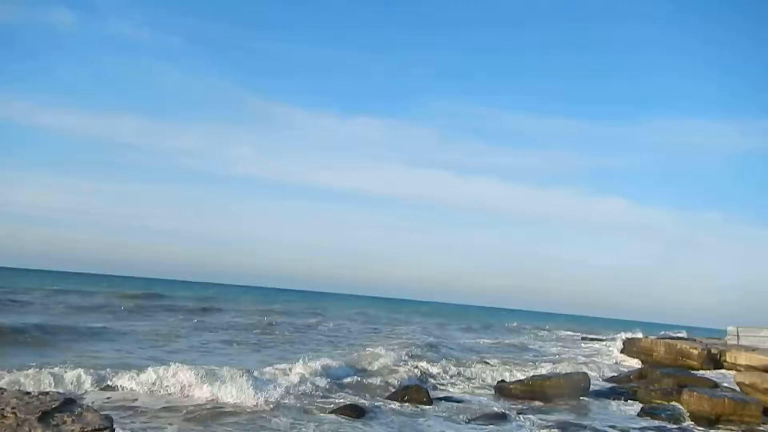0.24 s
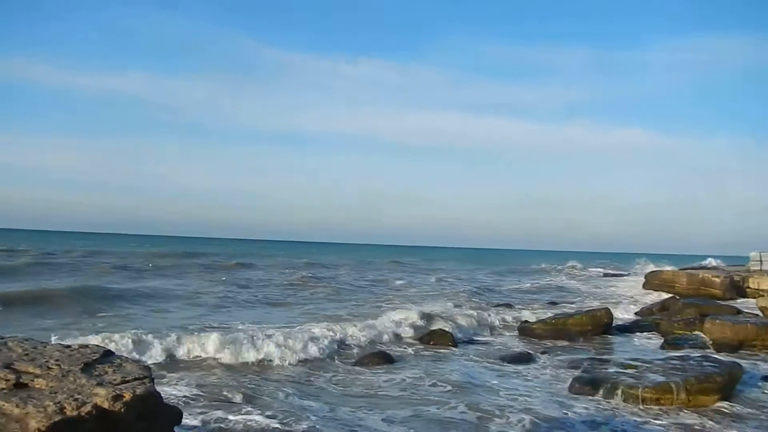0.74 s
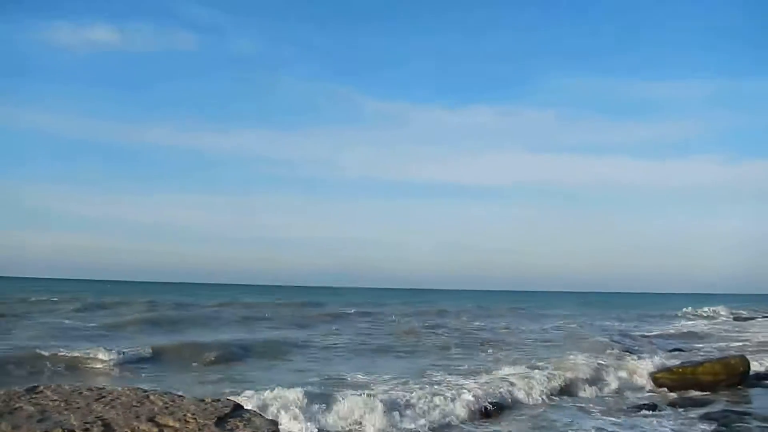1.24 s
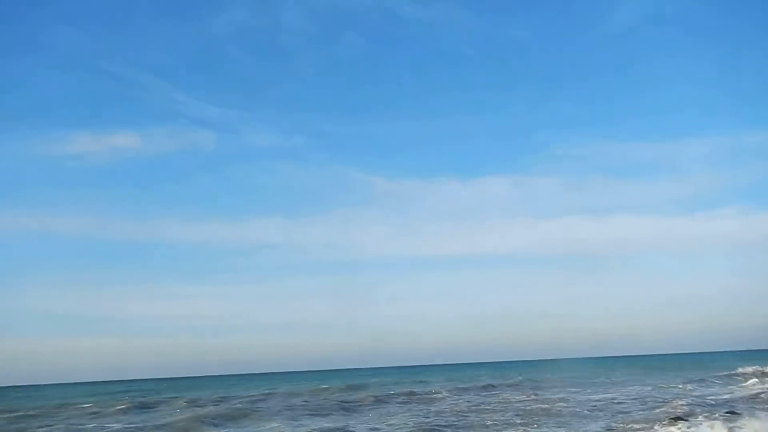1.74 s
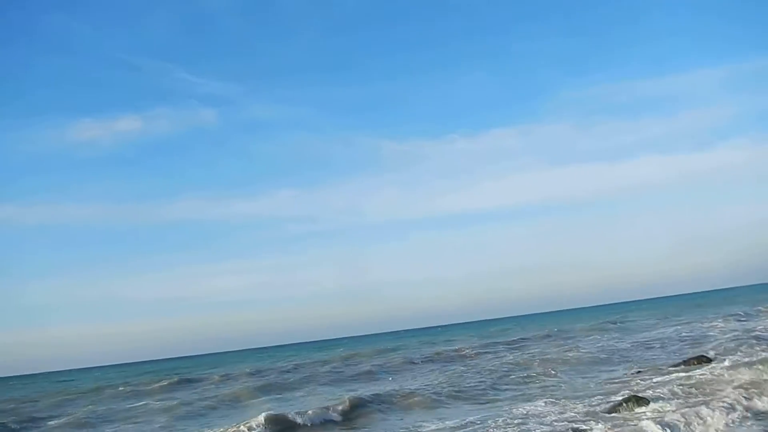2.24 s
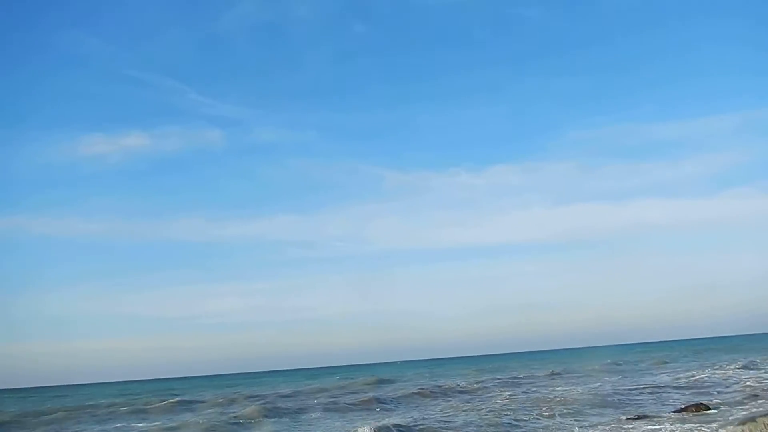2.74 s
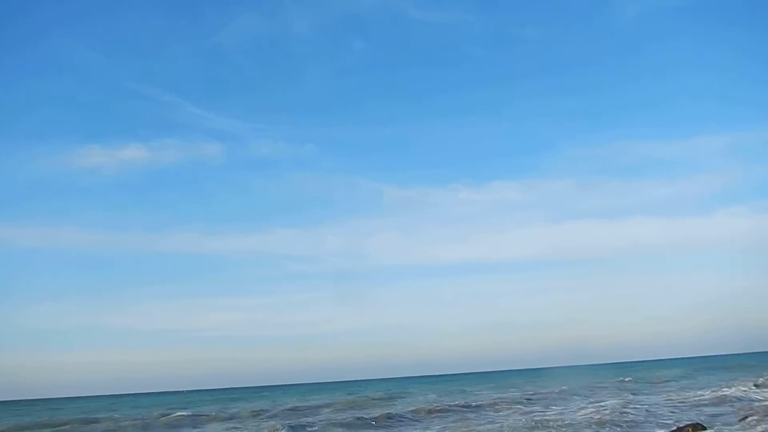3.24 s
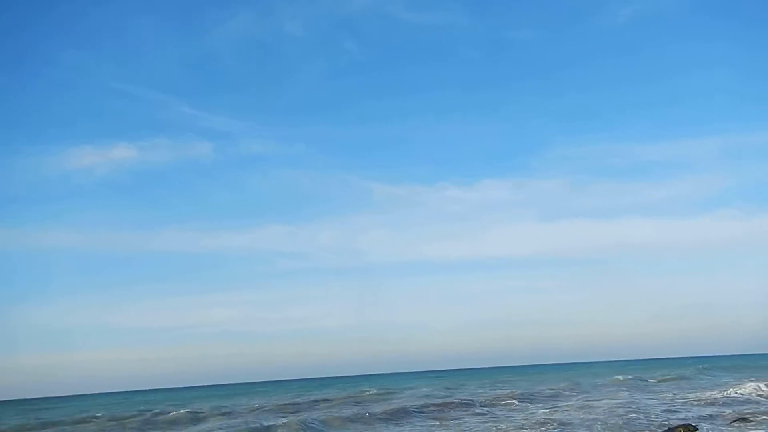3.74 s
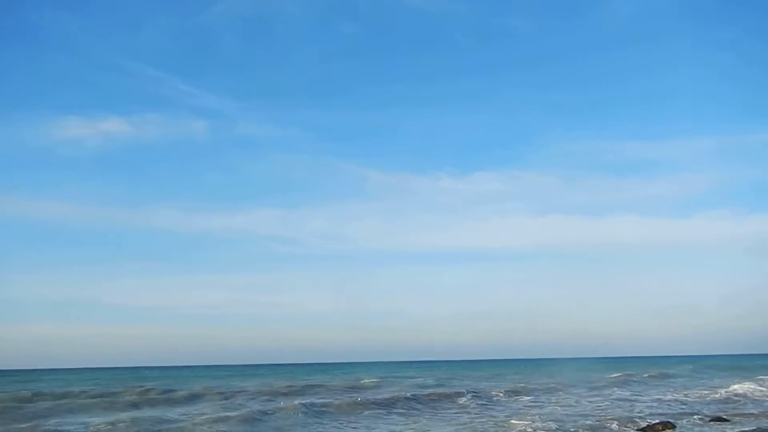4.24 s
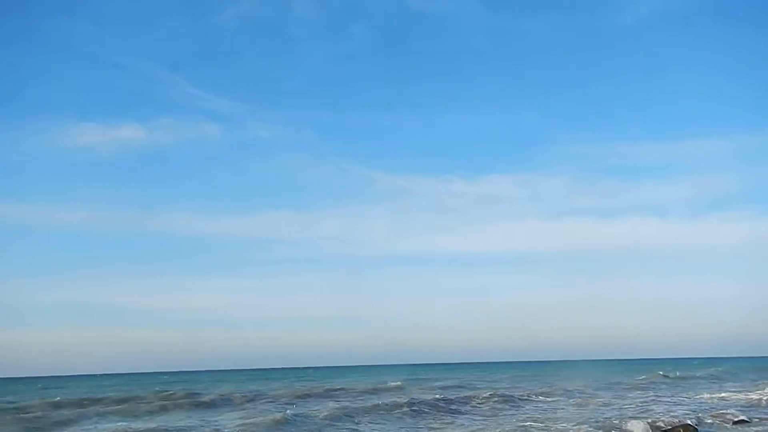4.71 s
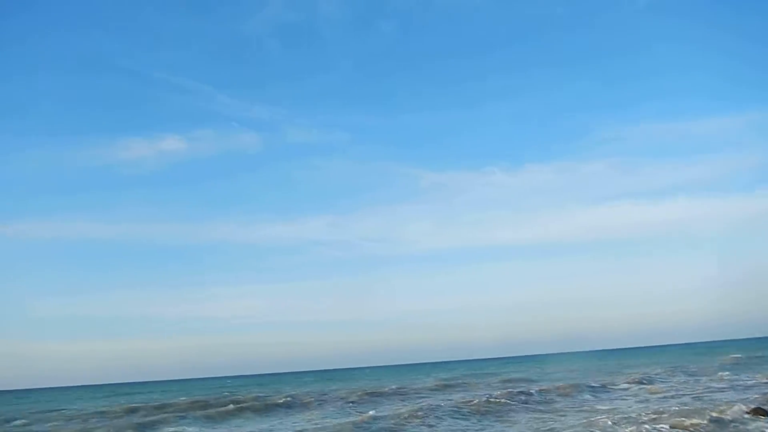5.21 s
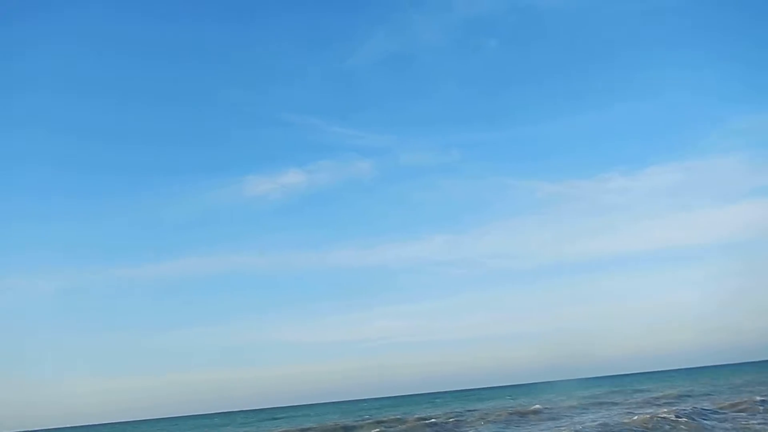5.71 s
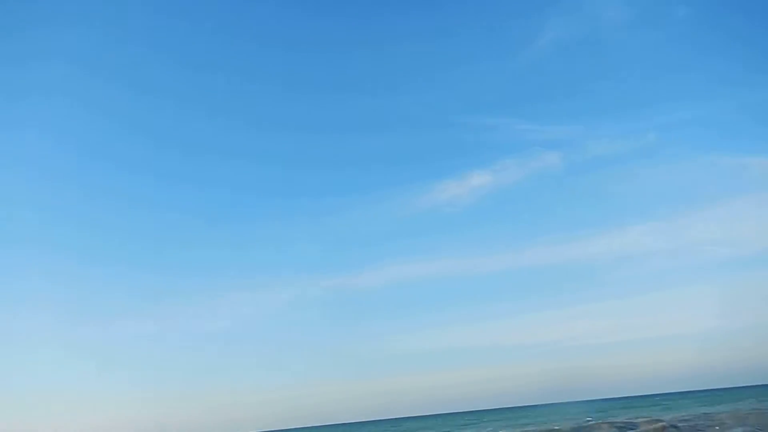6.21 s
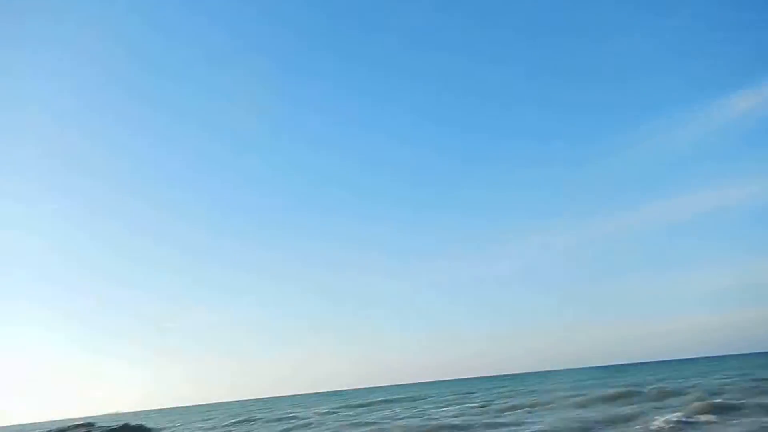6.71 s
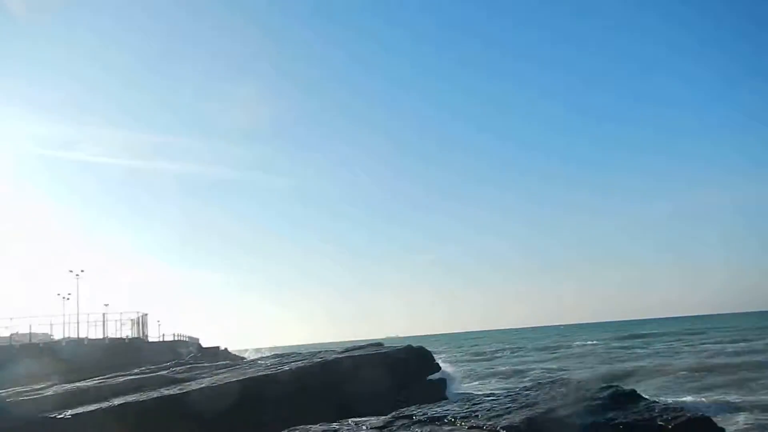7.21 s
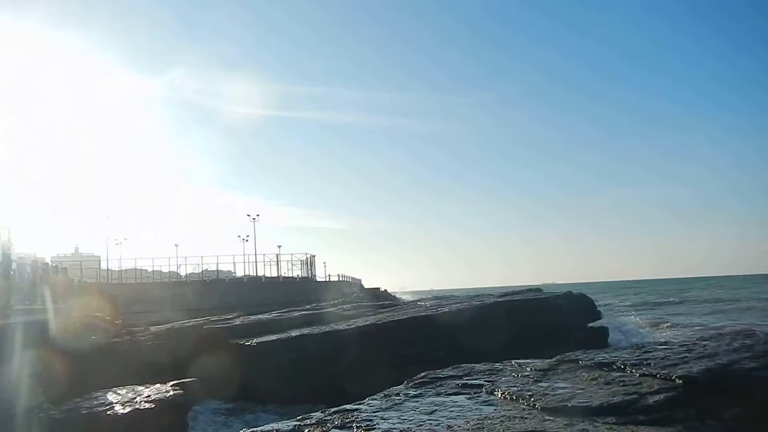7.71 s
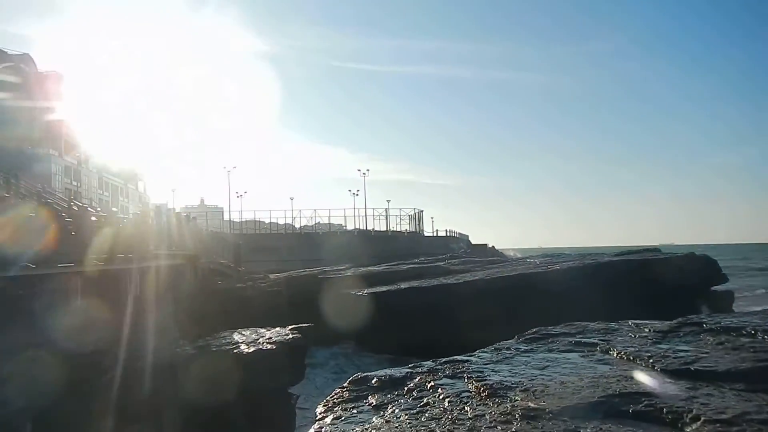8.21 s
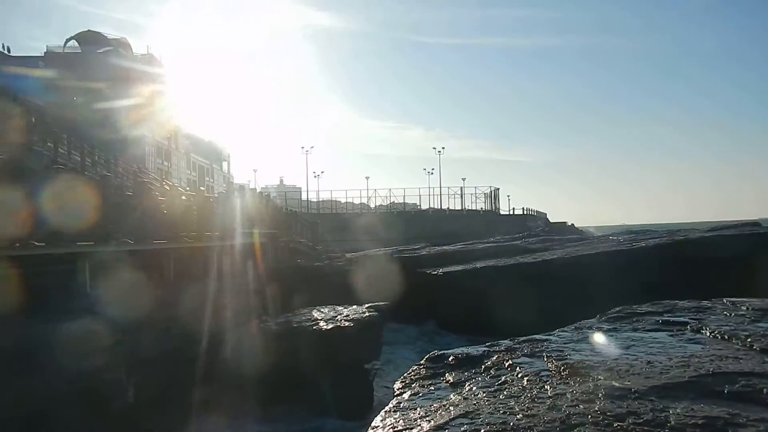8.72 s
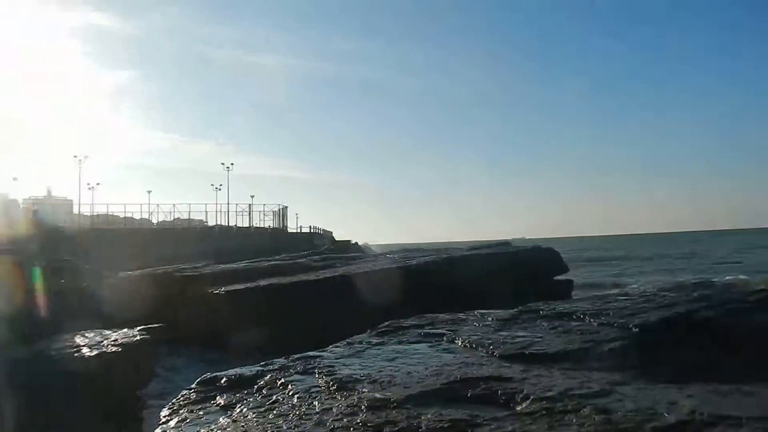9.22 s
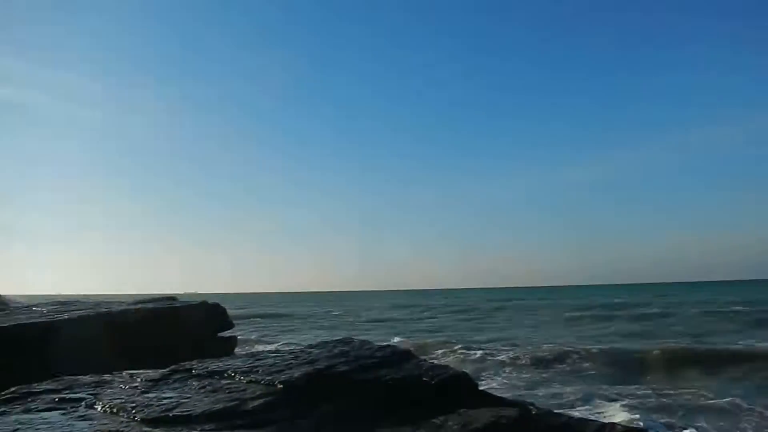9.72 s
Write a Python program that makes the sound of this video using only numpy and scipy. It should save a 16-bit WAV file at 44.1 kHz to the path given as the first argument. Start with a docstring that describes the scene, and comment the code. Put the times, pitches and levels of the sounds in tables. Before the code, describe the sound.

Sea surf washes over boulders for the whole ten seconds, a gently swelling foamy hiss above a low roar and faint deep rumble. Wind buffets the hand-held microphone from the start. Fingers tick and briefly rub on its casing at about 0.3 seconds and between 0.8 and 1.4 seconds; after the last sharp click, everything drops in level and creeps back over a second. From 2 to 5 seconds the gusts are strongest, with uneven low thumps and flutters, mostly on the right, and brief dips in loudness after hard hits. Buffeting continues on both sides, with faint water slaps around 5.5 seconds and a last strong flurry near 7. The wind then falls away, apart from one small puff near 8.8. From about 7.5 seconds, water surging between the rocks adds a hollow low boom beneath the surf, fullest around 9.5.

```python
"""Surf breaks and foams over boulders: countless bursting bubbles sum to broadband noise over a low roar.
Turbulent gusts buffet the two microphone ports of a hand-held camera with pressure pulses and flutters.
Early on, fingers tick and rub on the casing. Beneath lies a deep rumble, and near the end surging
water excites the air resonances of a gap between the rocks. After loud moments the whole level
drops at once and creeps back."""
import sys
import numpy as np
from scipy import signal
from scipy.fft import rfft, irfft
from scipy.io import wavfile
from scipy.ndimage import uniform_filter1d

SR = 44100
rng = np.random.default_rng(int(sys.argv[2]) if len(sys.argv) > 2 else 0)


def bounce(signal):
    """Save signal as a 16-bit WAV file at the path given by the first command-line argument."""
    frames = np.transpose(np.atleast_2d(signal))
    limited = np.clip(frames, -1, 1)
    pcm = np.round(limited * 32767).astype(np.int16)
    wavfile.write(sys.argv[1], SR, pcm)


N = 438794
TIME = np.arange(N) / SR
PAN_SPLIT = np.array([[.5], [-.5]])  # shares a left-minus-right level between the channels
WATER_PAN_DB = -2


def amplitude(db):
    """Amplitude ratio of a level in decibels."""
    return 10 ** (np.asarray(db) / 20)

def unit_rms(x):
    """Normalisation to unit mean power."""
    return x / np.sqrt(np.mean(x ** 2) + 1e-20)

def spectrum_at(points, hz):
    """Interpolation of (f, value) points on a logarithmic frequency axis."""
    f, value = np.transpose(points)
    return np.interp(np.log(hz + 1), np.log(f + 1), value)

def curves_at(rows, t):
    """Linear interpolation of (t, values...) rows, one curve per value."""
    times, *values = np.transpose(rows)
    return np.array([np.interp(t, times, v) for v in values])

def octave_bell(hz, centre_hz, octaves):
    """Gaussian band on a logarithmic frequency axis."""
    return np.exp(-(np.log2((hz + 1) / centre_hz) / octaves) ** 2)

def resonance(hz, centre_hz, width_hz):
    """Lorentzian curve of unit height."""
    return 1 / (1 + (2 * (hz - centre_hz) / width_hz) ** 2)

def minimum_phase(gain, size=4096):
    """Causal impulse response: its phase is minus the Hilbert transform of the log gain."""
    log_gain = np.log(np.maximum(np.r_[gain, gain[-2:0:-1]], 1e-5))
    return np.fft.ifft(np.exp(log_gain - 1j * signal.hilbert(log_gain).imag)).real[:size]

def wander(rate_hz, shape):
    """Smooth random fluctuation: noise through a two-pole low-pass."""
    pole = np.exp(-2 * np.pi * rate_hz / SR)
    return unit_rms(signal.lfilter([1], np.convolve([1, -pole], [1, -pole]), rng.standard_normal(shape)))

def trapezoid(t, start, length, edge_s):
    """Envelope with linear rise and fall; returns its slice of t and its values."""
    span = slice(*np.searchsorted(t, [start - edge_s, start + length + edge_s]))
    return span, np.clip(np.minimum(t[span] - start, start + length - t[span]) / edge_s + .5, 0, 1)


# Envelope of the deepest rumble: t/s, level/dB
RUMBLE_LEVEL = [(0, -40), (.6, -44), (1.2, -44), (4.0, -46), (5.5, -38), (6.3, -37), (7.0, -44), (7.4, -35),
                (7.9, -32), (8.05, -40), (8.3, -46), (8.7, -35), (9.1, -34), (9.45, -49.5), (9.95, -47)]

def deep_rumble():
    """Narrow-band noise heaves at the lower limit of hearing, partly coherent between the ports."""
    band = octave_bell(np.fft.rfftfreq(N, 1 / SR), centre_hz=30, octaves=0.72)
    heave = irfft(rfft(rng.standard_normal((2, N))) * band, N)
    return unit_rms(heave + 0.24 * heave[::-1]) * amplitude(curves_at(RUMBLE_LEVEL, TIME)[0])


# Envelope of the boom between the rocks: t/s, level/dB
CAVITY_LEVEL = [(0, -47), (7.0, -54), (7.6, -34), (8.6, -32), (9.2, -32), (9.5, -25), (9.95, -28)]
# Air modes of the gap: f/Hz, bandwidth/Hz, relative level/dB
CAVITY_MODES = [(121, 38, -1), (238, 63, 0.5), (390, 130, -8.5)]

def cavity_boom():
    """Cavity resonance: surging water drives the air in a gap between boulders."""
    hz = np.fft.rfftfreq(N, 1 / SR)
    response = sum(amplitude(db) * resonance(hz, f, width) for f, width, db in CAVITY_MODES)
    boom = unit_rms(irfft(rfft(rng.standard_normal(N)) * response, N))
    return boom * amplitude(curves_at(CAVITY_LEVEL, TIME)[0] + PAN_SPLIT * WATER_PAN_DB)


# Finger strokes: t/s, duration/s, level/dB, centre f/Hz
STROKES = [(0.785, 0.055, -25, 8600), (0.878, .045, -39, 8200), (1.218, 0.055, -30, 7800),
           (1.245, .03, -28, 7600)]

def finger_rubs():
    """Friction noise: a finger sliding on the casing makes a grainy hiss that swells and fades."""
    out, hz = np.zeros((2, N)), np.fft.rfftfreq(8192, 1 / SR)
    for start, length, db, centre_hz in STROKES:
        n = round(length * SR)
        grit = rng.standard_normal((2, 8192)) * amplitude(3 * wander(300, (1, 8192)))
        band = np.exp(-((hz / centre_hz - 1) / 0.31) ** 2)
        hiss = unit_rms(irfft(rfft(grit) * band))[:, :n]
        out[:, round(start * SR):][:, :n] += amplitude(db) * hiss * np.sqrt(np.hanning(n))
    return out


# Finger impacts: t/s, ring gain/dB, ring T60/s, snap gain/dB, snap T60/s, snap emphasis f/Hz,
# left minus right/dB
IMPACTS = [(0.3474, -14, 0.014, -31, .01, 6000, -8), (0.804, -24, 0.0091, -4.5, 0.011, 9900, 0),
           (0.806, -11.5, 0.022, -18, .03, 8500, -6), (.8185, -30, .015, -20, .02, 9000, 0),
           (0.8977, -12, 0.0086, -16, 0.017, 8500, -3), (0.9016, -14, 0.026, -13, .012, 12000, -6),
           (.904, -11, 0.017, -26, .02, 5600, -6), (0.9112, -19.5, 0.023, -15.5, .025, 7940, -5),
           (1.03, -25, 0.016, -34, .02, 6000, 0), (1.258, -30, .02, -22, 0.03, 6500, 2),
           (1.416, -26, .025, -5, 0.025, 13700, 5)]
# Modes of the casing: f/Hz, relative level/dB
CASING_MODES = [(1250, -6), (1750, -3), (1990, -1), (2260, 0.5)]
# Spectrum of the contact noise: f/Hz, relative level/dB
SNAP_SPECTRUM = [(500, -22), (2000, -15), (5500, -4.5), (8500, -8), (16000, -17)]

def finger_ticks():
    """Impact excitation: each tick is a snap of noise plus the damped modes of the casing."""
    out, t = np.zeros((2, N + SR)), np.arange(3000) / SR
    mode_hz, mode_db = np.transpose(CASING_MODES)[:, :, None]
    hz = np.fft.rfftfreq(512, 1 / SR)
    attack = np.minimum(t / 0.00036, 1)
    phases = rng.random((len(IMPACTS), len(CASING_MODES), 1))
    noises = rng.standard_normal((len(IMPACTS), 2, len(t)))
    for impact, phase, noise in zip(IMPACTS, phases, noises):
        start, ring_db, ring_t60, snap_db, snap_t60, snap_hz, pan_db = impact
        modes = np.sum(amplitude(mode_db) * np.sin(2 * np.pi * (mode_hz * t + phase)), axis=0)
        ring = modes * attack * amplitude(ring_db - 60 * t / ring_t60)
        emphasis_db = 15.6 * np.exp(-((hz / snap_hz - 1) / 0.2) ** 2)
        colour = minimum_phase(amplitude(spectrum_at(SNAP_SPECTRUM, hz) + emphasis_db), size=256)
        burst = noise * amplitude(snap_db - 60 * t / snap_t60)
        snap = signal.oaconvolve(burst, colour[None])[:, :len(t)]
        out[:, round(start * SR):][:, :len(t)] += amplitude(PAN_SPLIT * pan_db) * (ring + snap)
    return out[:, :N]


# Brief oscillations of the air: t/s, duration/s, level/dB, f/Hz, port (0 left, 1 right)
PORT_FLUTTERS = [(1.751, 0.033, -8, 123, 1), (1.814, .03, -12, 129, 1), (2.527, 0.024, -5, 124, 1),
                 (3.114, 0.024, -6.5, 149, 1), (3.398, 0.011, -2.5, 257, 0), (3.412, .045, -3.5, 130, 1),
                 (3.418, .016, -7, 340, 0), (3.514, 0.029, -0.5, 124, 1), (3.569, 0.022, -6.5, 211, 1),
                 (3.812, .045, -6, 129, 1), (3.841, .03, -9.5, 193, 1), (4.264, 0.053, -9, 102, 1),
                 (4.46, .023, -10.5, 150, 1), (4.628, 0.019, -11, 149, 1), (4.663, .02, -10, 164, 1),
                 (4.813, 0.042, -7, 117.5, 0), (4.942, 0.025, -10.5, 166, 0), (5.015, 0.028, -10, 148, 0),
                 (5.375, 0.023, -10, 268, 0), (5.4, .022, -15, 558, 0), (6.377, 0.026, -10, 233, 0),
                 (6.577, 0.048, -7, 232, 0), (6.655, 0.013, -7, 251, 0), (6.831, 0.021, -12.5, 181, 0),
                 (6.863, 0.028, -7, 249, 1), (6.87, 0.032, -2.5, 205, 0), (6.927, 0.021, -2.5, 221, 1),
                 (7.011, 0.017, -11, 270, 1)]

def port_flutters():
    """Flow-induced oscillation: air locks into a wobbling tone at a port. Returns sound and envelope."""
    out, locked = np.zeros((2, N)), np.zeros((2, N))
    pitch_drift, level_drift = wander(81, (2, 2, N))
    for (start, length, db, hz, port), phase in zip(PORT_FLUTTERS, rng.random(len(PORT_FLUTTERS))):
        span, envelope = trapezoid(TIME, start, length, edge_s=0.0079)
        pitch_hz = hz * (1 + .12 * pitch_drift[port, span])
        angle = 2 * np.pi * (np.cumsum(pitch_hz) / SR + phase)
        wave = np.cos(angle) + 0.21 * np.cos(2 * angle)  # the second harmonic sharpens the crests
        out[port, span] += envelope * amplitude(db + 2.8 * level_drift[port, span]) * wave
        locked[port, span] = np.maximum(locked[port, span], envelope)
    return out, locked


# Steady stream as the camera turns in it: t/s, level/dB, rumble f/Hz, factor on the spectral slopes
AIR_STREAM = [(0, -33, 110, 0.96), (.5, -30, 162, 1.55), (1.1, -23.5, 145, 1.3), (1.7, -21, 120, 1.15),
              (2.3, -16, 157, 0.93), (2.5, -19.5, 130, 1.1), (3.5, -19.5, 132, 1.06), (3.9, -31, 138, 1.37),
              (4.8, -21.5, 137, 1.07), (5.38, -18.5, 158, 1), (5.6, -20.5, 124, 1.1), (5.95, -22, 105, 1.1),
              (6.15, -28, 118, 2.1), (6.35, -20, 169, 3.6), (6.5, -23, 233, 2.2), (6.9, -23.5, 235, 1.8),
              (7.03, -27, 238, 1.3), (7.25, -36, 144, 0.78), (7.6, -34, 148, 0.52), (8.5, -47, 152, 2.8),
              (9.95, -48, 220, 1.4)]
# Gusts on single ports: t/s, duration/s, level/dB, rumble f/Hz, port (0 left, 1 right)
GUSTS = [(0.067, 0.098, -19.5, 121, 0), (0.082, 0.053, -14, 135, 1), (0.184, 0.032, -17.5, 120, 1),
         (0.186, 0.025, -14.5, 145, 0), (0.443, 0.082, -16, 184, 0), (0.522, 0.049, -17, 112, 0),
         (0.735, 0.034, -12.5, 168, 0), (0.779, 0.034, -13, 175, 0), (0.86, 0.068, -16, 128, 1),
         (1.017, 0.027, -7.5, 129, 1), (1.126, 0.049, -12.5, 176, 1), (1.199, 0.078, -10, 176, 0),
         (1.204, 0.075, -12.5, 162, 1), (1.287, 0.045, -8, 122, 1), (1.309, 0.021, -9.5, 202, 0),
         (1.349, 0.026, -13, 157, 0), (1.394, 0.023, -11.5, 168, 1), (1.452, 0.37, -19, 130, 1),
         (1.52, 0.056, -15, 131, 1), (1.61, 0.047, -17, 147, 1), (1.653, 0.057, -18.0, 114, 1),
         (1.75, 0.045, -10, 140, 1), (1.802, 0.056, -20, 142, 1), (1.847, 0.035, -17.5, 112, 0),
         (1.87, 2.5, -18.5, 151, 1), (1.883, 0.11, -9.5, 166, 1), (1.888, 0.054, -16, 108, 0),
         (1.987, 0.065, -9, 178, 1), (2.073, 0.048, -12.5, 156, 1), (2.095, 0.15, -11.0, 155, 0),
         (2.146, 0.14, -6, 184, 1), (2.258, 0.034, -14, 162, 0), (2.266, 0.064, -7, 206, 1),
         (2.324, 0.16, -11.5, 191, 1), (2.495, 0.06, -8.5, 136, 1), (2.501, 0.042, -13, 103, 0),
         (2.56, 0.035, -9.0, 169, 1), (2.603, 0.036, -10, 161, 1), (2.683, 0.081, -13, 151, 1),
         (2.692, 0.05, -11, 116, 0), (2.765, 0.055, -21, 113, 0), (2.768, 0.061, -8, 133, 1),
         (2.83, 0.042, -8.5, 155, 1), (2.897, 0.073, -10.5, 123, 1), (3.077, 0.04, -9, 121, 1),
         (3.206, 0.092, -19, 150, 0), (3.257, 0.048, -20, 174, 0), (3.341, 0.033, -8, 151, 1),
         (3.376, 0.064, -8, 248, 0), (3.395, 0.084, -9.5, 146, 1), (3.512, 0.037, -3, 158, 1),
         (3.526, 0.025, -6, 153, 0), (3.572, 0.033, -9.5, 191, 1), (3.609, 0.074, -8.5, 162, 1),
         (3.72, 0.074, -6, 145, 1), (3.814, 0.06, -12, 158, 1), (3.87, 0.071, -9.5, 131, 1),
         (4.076, 0.026, -16, 174, 1), (4.261, 0.028, -7, 123, 1), (4.287, 0.025, -12.0, 119, 1),
         (4.294, 0.055, -10.5, 174, 0), (4.323, 0.024, -13.5, 117, 1), (4.4, 1.7, -22, 140, 1),
         (4.423, 0.061, -14, 134, 1), (4.489, 0.031, -16.0, 138, 1), (4.59, 0.033, -14, 129, 1),
         (4.62, 0.035, -8, 164, 1), (4.659, 0.038, -11, 161, 1), (4.782, 0.094, -9.5, 138, 0),
         (4.853, 0.054, -10, 143, 1), (4.882, 0.03, -9, 185, 0), (4.91, 0.072, -9, 221, 0),
         (4.937, 0.067, -12, 143, 1), (5.013, 0.054, -22, 160, 0), (5.014, 0.023, -15, 117, 1),
         (5.047, 0.032, -10.5, 158, 1), (5.089, 0.05, -7.5, 168, 1), (5.201, 0.065, -9, 148, 0),
         (5.367, 0.064, -14.5, 228, 0), (5.44, 0.052, -23, 164, 1), (5.485, 0.032, -16, 132, 1),
         (5.546, 0.11, -16, 166, 1), (5.548, 0.05, -17.5, 134, 0), (5.627, 0.054, -15, 127, 1),
         (5.65, 0.052, -16, 142, 0), (5.79, 0.083, -16.5, 125, 0), (5.88, 0.068, -15.0, 105, 0),
         (5.93, 0.092, -14, 140, 1), (5.955, 0.038, -13, 123, 0), (5.992, 0.046, -14, 132, 0),
         (6.048, 0.05, -14, 100, 1), (6.062, 0.047, -16, 131, 0), (6.11, 0.067, -11, 130, 1),
         (6.121, 0.027, -12, 142, 0), (6.34, 0.088, -12, 205, 0), (6.45, 0.054, -13, 272, 0),
         (6.577, 0.055, -7, 233, 0), (6.648, 0.031, -8, 248, 0), (6.68, 0.046, -17, 206, 0),
         (6.84, 0.056, -11, 216, 0), (6.86, 0.05, -7, 235, 1), (6.893, 0.016, -11, 212, 0),
         (6.895, 0.087, -10, 273, 1), (6.938, 0.025, -7, 242, 0), (6.996, 0.036, -9, 278, 1),
         (6.999, 0.026, -18, 338, 0), (8.819, 0.022, -16, 131, 1)]

def airflow(t):
    """Incoherent addition: stream and gusts sum in power. Returns strength, pitch and slope factor."""
    level_db, stream_hz, slope = curves_at(AIR_STREAM, t)
    power = np.tile(amplitude(level_db) ** 2, (2, 1))
    weighted_log_pitch = power * np.log(stream_hz)
    for start, length, db, hz, port in GUSTS:
        span, envelope = trapezoid(t, start, length, edge_s=0.018)
        gust_power = (amplitude(db) * envelope) ** 2
        power[port, span] += gust_power
        weighted_log_pitch[port, span] += gust_power * np.log(hz)
    return np.sqrt(power), np.exp(weighted_log_pitch / power), slope


# Hardest single buffets: t/s, relative level/dB, port (0 left, 1 right)
BUFFETS = [(0.098, 5, 1), (0.198, 5, 0), (1.148, 0, 1), (1.248, -2, 0), (1.305, 8, 1), (1.324, 7, 0),
           (1.407, 9, 1), (2.161, 6, 0), (2.193, 6, 1), (2.287, 12, 1), (2.58, 7, 1), (2.74, 7, 0),
           (2.8, 7, 1), (2.803, 3.5, 0), (2.84, 2, 0), (3.096, 7, 1), (3.236, 10.5, 1), (3.408, 13, 0),
           (3.52, 10, 1), (3.549, 15, 0), (3.882, 3, 1), (4.083, 6, 1), (4.325, 12, 0), (4.594, 3, 1),
           (4.876, 7, 1), (4.914, 0, 0), (4.943, 10, 0), (4.989, 10, 1), (5.247, 0, 0), (5.39, 10, 0),
           (6.009, 3, 0), (6.14, 8.5, 0), (6.155, 13, 1), (6.473, 8, 0), (6.699, 2, 0), (6.709, 7, 0),
           (6.849, 10, 0), (6.903, 13, 0), (6.953, -2, 0), (7.016, 12, 1), (8.832, 1, 1)]
# Eddy pressure spectrum at the reference pitch: f/Hz, relative level/dB
EDDY_SPECTRUM = [(12, -34), (25, -14), (40, -4.5), (60, -0.5), (125, 0), (250, -8), (500, -17.5),
                 (1200, -38), (4000, -72)]
EDDY_REFERENCE_HZ, EDDIES_PER_S = 135, 700

def wind_buffeting():
    """Turbulent pressure as shot noise: eddies strike each port independently in uneven pulses."""
    sizes = amplitude(2 * np.minimum(rng.exponential(1, (2, N)), 4)) * rng.choice([-1., 1.], (2, N))
    arrivals = rng.random((2, N)) < EDDIES_PER_S / SR
    pulses = unit_rms(sizes * arrivals * amplitude(2 * wander(17.6, (2, N))))
    flutter, locked = port_flutters()
    pulses *= airflow(TIME)[0] * (1 - 0.59 * locked)  # flutter replaces part of the eddies
    unit_pulse_peak = 0.34  # approximate height of a unit impulse after filtering
    scatter = rng.uniform(-0.994, 1, (len(BUFFETS), 2, 4))
    for (time, db, port), (offsets, side_sizes) in zip(BUFFETS, scatter):
        at = ((time + 0.01144 * np.r_[0, offsets]) * SR).astype(int)  # a main pulse amid four smaller
        pulses[port, at] += np.r_[1, .4 * side_sizes] * amplitude(db) / unit_pulse_peak
    hz, t, spectra = signal.stft(pulses, SR, nperseg=1024, noverlap=768)
    hz = hz[:, None]
    strength, pitch_hz, slope = airflow(t)
    colour = amplitude(slope * spectrum_at(EDDY_SPECTRUM, hz * EDDY_REFERENCE_HZ / pitch_hz[:, None]))
    colour /= np.sqrt(np.mean(colour ** 2, axis=1, keepdims=True))
    # Faster air sheds smaller eddies, so strong gusts are brighter.
    bright_db = 0.57 * (20 * np.log10(strength)[:, None] + 15) * hz / (hz + 900)
    spectra *= colour * amplitude(bright_db) * np.exp(-1j * np.pi / 3)  # phase lag: push, then suction
    ports = signal.istft(spectra, SR, nperseg=1024, noverlap=768)[1][:, :N] + flutter
    return ports + 0.058 * ports[::-1]  # large eddies reach both ports


# Course of the waves: t/s, foam level/dB, roar boost/dB, tumbling-water boost/dB, fizz boost/dB
WAVES = [(0, -29, -2.5, 1.5, 1), (.35, -24.5, 0, -0.5, -3), (.9, -25.5, -4, 1.5, 1), (1.2, -22, -3, 0.5, 1),
         (1.45, -28.5, 0.5, 1.5, -1), (2.0, -24.5, -2, 1, 2), (2.6, -22.5, -2, -0.5, 0),
         (2.95, -25, -4.5, 1, 2.5), (3.4, -22, 2.5, -1, 1), (4.35, -21.5, -2.5, -0.5, 2.5),
         (4.54, -21.5, -2.5, 1, 4), (4.65, -26, -2, 2.5, 1.5), (5.15, -24.5, 2.5, 1.5, 3),
         (5.35, -27.5, -2, 3.5, 1), (5.385, -26.5, 0, 4, 3), (5.6, -26, 0, 5.5, 1),
         (5.95, -25.5, 1, 4, 2.5), (6.75, -27.5, 1, 2, -2), (7.3, -24.5, -2, -1.5, -1),
         (7.56, -28.5, 3.5, 1.5, -3), (8.2, -28.5, 2, 2, -1), (8.8, -28.5, 1.5, 2, -3),
         (9.2, -31.5, 6, 3.5, -2), (9.95, -27, 0.5, 2, -4)]
# Spectrum of the foam: f/Hz, relative level/dB
FOAM_SPECTRUM = [(20, -10), (60, 13), (125, 16.5), (250, 10), (500, 7), (1000, 2), (2000, -0.5),
                 (4000, -11), (16000, -11)]
# Likeness of the surf at the two ports: f/Hz, correlation coefficient
SURF_COHERENCE = [(60, 0.65), (200, 1), (1000, 0.93), (2000, 0.85), (3000, 0.4), (3800, 0.85), (4500, 0.26),
                  (5400, 0.72), (6400, 0.25), (7400, 0.22), (10000, 0.14)]
# Phase lead of the left port: f/Hz, phase/rad
SURF_PHASE_LEAD = [(1000, .15), (2350, -.05), (2800, .5), (3750, .8), (4050, -.8), (4400, -1.5), (4700, 1),
                   (5340, .7), (6000, -1.3), (6800, -4.5), (8500, -3.4), (12000, -3.4)]
# Slaps of water on rock: t/s, 1/e half-duration/s, boost/dB, centre f/Hz, 1/e half-width/octaves
WATER_SLAPS = [(5.395, 0.01, 8, 800, 0.82), (5.657, 0.021, 3.5, 900, 0.61), (5.913, .03, 6, 700, 0.74),
               (7.27, .004, 4, 2500, 1.1), (7.311, 0.0041, 8, 3000, 1.8), (8.643, 0.011, 6, 1500, .7),
               (8.78, .003, 7, 1500, .7), (9.157, .004, 3, 1500, .8), (9.878, .005, 6, 2400, .6)]

def surf():
    """Superposition: countless bursting bubbles sum to Gaussian noise, in patches over a low roar."""
    frames, hz = N // 128 + 5, np.fft.rfftfreq(512, 1 / SR)[:, None]
    t = np.arange(frames) * 128 / SR
    left_re, left_im, other_re, other_im, patches = rng.standard_normal((frames, 257, 5)).T
    patches = unit_rms(uniform_filter1d(uniform_filter1d(patches, size=8, axis=0), size=24, axis=1))
    splashes = unit_rms(uniform_filter1d(rng.standard_normal(frames), size=10))  # span all frequencies
    coherence = spectrum_at(SURF_COHERENCE, hz)
    left = left_re + 1j * left_im
    right = coherence * left + np.sqrt(1 - coherence ** 2) * (other_re + 1j * other_im)
    spectra = np.array([left * np.exp(1j * spectrum_at(SURF_PHASE_LEAD, hz)), right])
    foam_db = spectrum_at(FOAM_SPECTRUM, hz)
    band_power = np.sum(amplitude(foam_db) ** 2 * ((hz > 1000) & (hz < 6000)))  # foam level reference
    spectra *= amplitude(foam_db + 0.93 * patches + 0.53 * splashes) / np.sqrt(band_power)
    level_db, roar_db, tumble_db, fizz_db = curves_at(WAVES, t)
    spectra *= amplitude(level_db + PAN_SPLIT[:, None] * WATER_PAN_DB)
    spectra *= amplitude(roar_db * octave_bell(hz, 183, 1.44)
                         + tumble_db * octave_bell(hz, 750, 1.5)
                         + fizz_db * octave_bell(hz, 10500, 0.2))
    for time, half_length, db, centre_hz, octaves in WATER_SLAPS:
        swell = np.exp(-((t - time) / half_length) ** 2)
        spectra *= amplitude(db * octave_bell(hz, centre_hz, octaves) * swell)
    wash = 0.84 * signal.istft(spectra, nperseg=512, noverlap=384)[1][:, :N]
    return signal.sosfilt(signal.butter(2, 57.4, btype='high', fs=SR, output='sos'), wash)


def scene():
    """Linear superposition of the pressures from water, wind and fingers."""
    return surf() + wind_buffeting() + finger_ticks() + cavity_boom() + finger_rubs() + deep_rumble()


# Sudden drops of the whole level: t/s, depth/dB
LEVEL_DROPS = [(0.83, 3.5), (0.925, 3.5), (1.246, 2), (1.419, 15.5), (2.193, 4), (2.855, 6.5), (3.355, 6.5),
               (3.546, 2), (3.886, 5.5), (4.274, 3), (4.854, 5), (5.066, 3.5), (5.892, 2.5), (6.849, 4.5),
               (6.907, 5)]
RECOVERY_DB_PER_S = 14

def level_drop_gain():
    """Cumulative attenuation: each drop adds to what remains of the last and recovers linearly in dB."""
    loss_db = np.zeros(N)
    for start, depth_db in LEVEL_DROPS:
        recovering_db = loss_db[round(start * SR)] + depth_db - RECOVERY_DB_PER_S * (TIME - start)
        loss_db = np.where(TIME < start, loss_db, np.maximum(recovering_db, 0))
    return amplitude(-uniform_filter1d(loss_db, size=180))

def notch(hz, centre_hz, width_hz, depth_db):
    """Antiresonance: a Lorentzian dip in power; a negative depth gives a peak."""
    return np.sqrt(1 - (1 - amplitude(-depth_db) ** 2) * resonance(hz, centre_hz, width_hz))


# Frequency response of the microphone: f/Hz, gain/dB
MIC_RESPONSE = [(1500, 0.5), (2100, 1.5), (2600, 0), (3400, 6), (3850, 10), (4600, 4.5), (5400, 11),
                (5800, 6), (6150, -3.5), (6650, -14.5), (7300, -11.5), (7850, -10.5), (8400, -13),
                (10000, -17.5), (15700, -28.5)]
# Notches common to both ports: f/Hz, bandwidth/Hz, depth/dB
SHARED_NOTCHES = [(2498, 92, 28), (3205, 423, 39), (4980, 64, 19), (6160, 120, 6), (6600, 130, 16)]
# A peak on the left port, then a notch on the right: f/Hz, bandwidth/Hz, depth/dB
PORT_COLOUR = [(4306, 88, -8), (3970, 98, 21)]
OVERLOAD_CEILING, BAND_LIMIT_HZ = .92, 15760

def record(dry):
    """Cascaded stages: microphone response, level drops, soft saturation and a low-pass band limit."""
    hz = np.fft.rfftfreq(8192, 1 / SR)
    notches = np.prod([notch(hz, *row) for row in SHARED_NOTCHES], axis=0)
    shared = amplitude(spectrum_at(MIC_RESPONSE, hz)) * notches
    responses = np.array([minimum_phase(shared * notch(hz, *row)) for row in PORT_COLOUR])
    level = signal.oaconvolve(dry, responses, axes=1)[:, :N] * level_drop_gain()
    saturated = level / (1 + abs(level / OVERLOAD_CEILING) ** 4) ** .25
    low_pass = signal.firwin(1535, BAND_LIMIT_HZ, window=("kaiser", 9), fs=SR)
    return signal.oaconvolve(saturated, low_pass[None], "same")


dry = scene()
out = record(dry)
bounce(out)
```